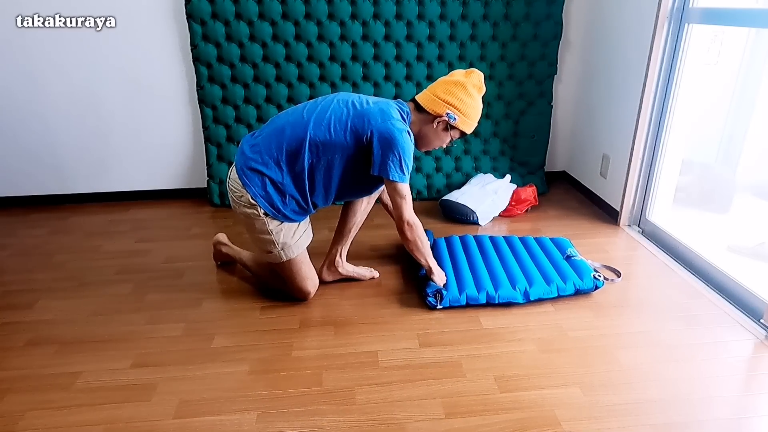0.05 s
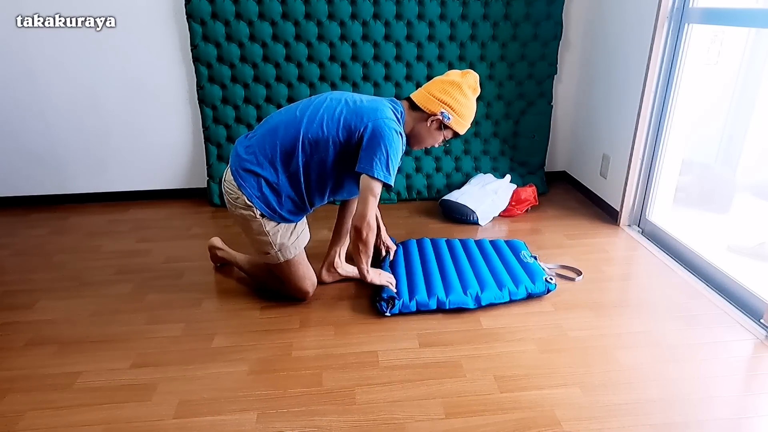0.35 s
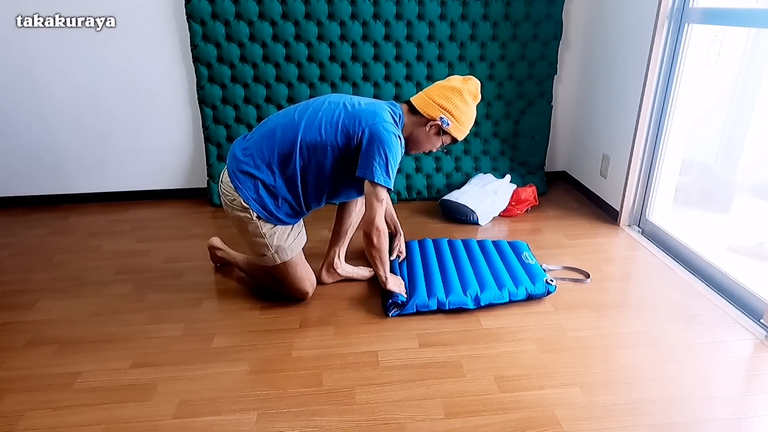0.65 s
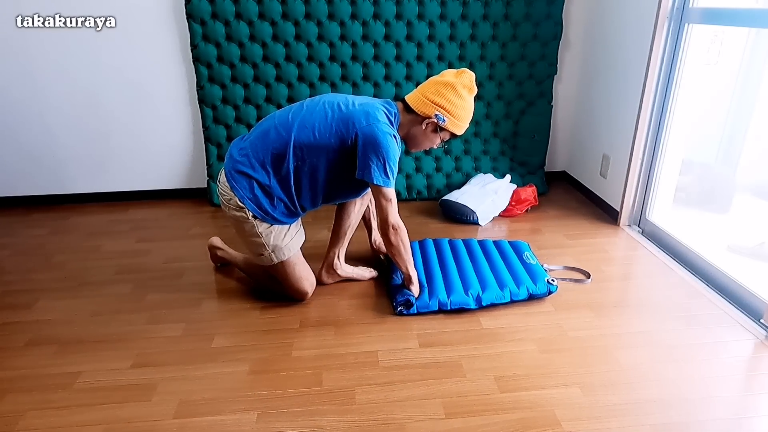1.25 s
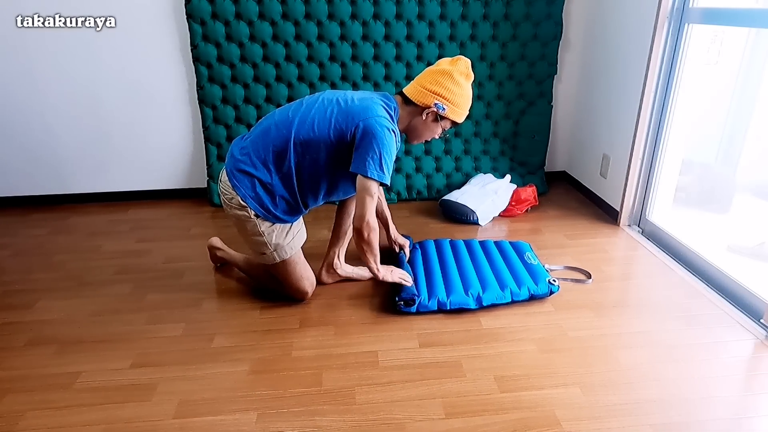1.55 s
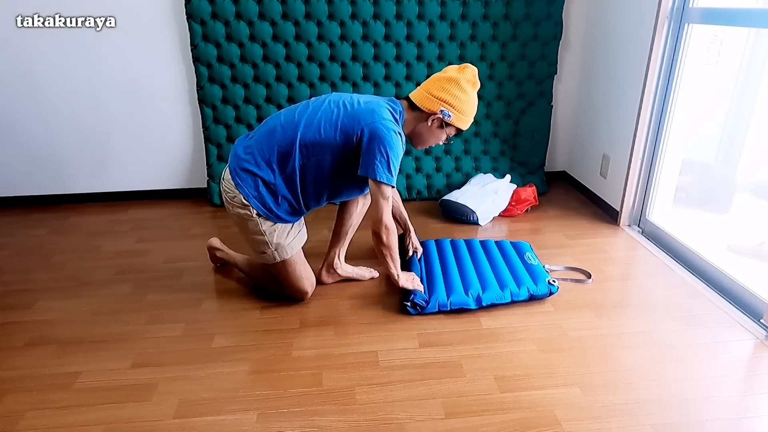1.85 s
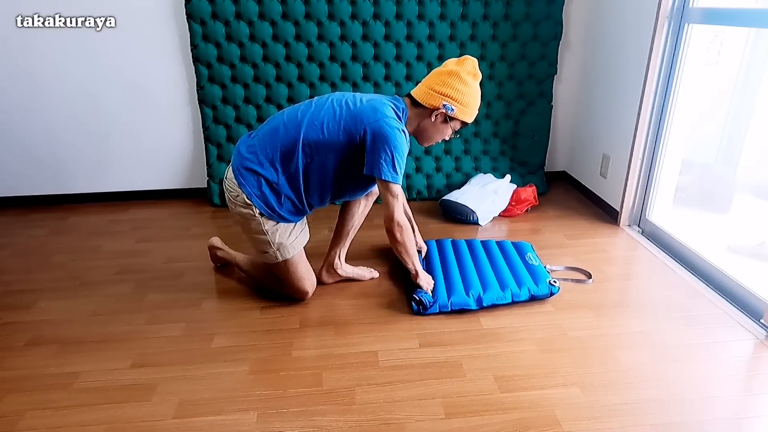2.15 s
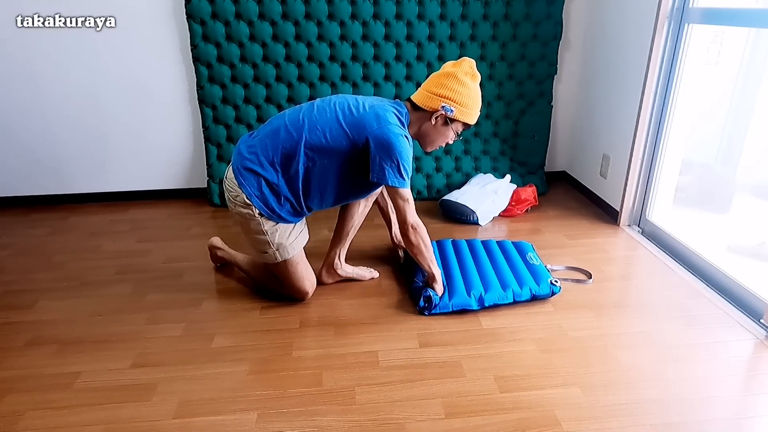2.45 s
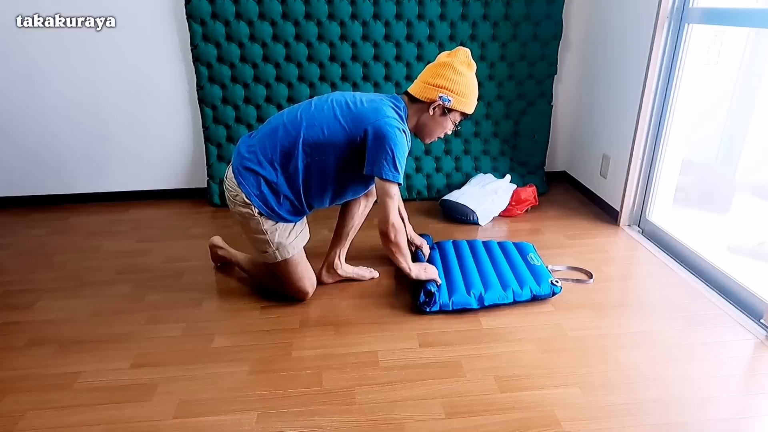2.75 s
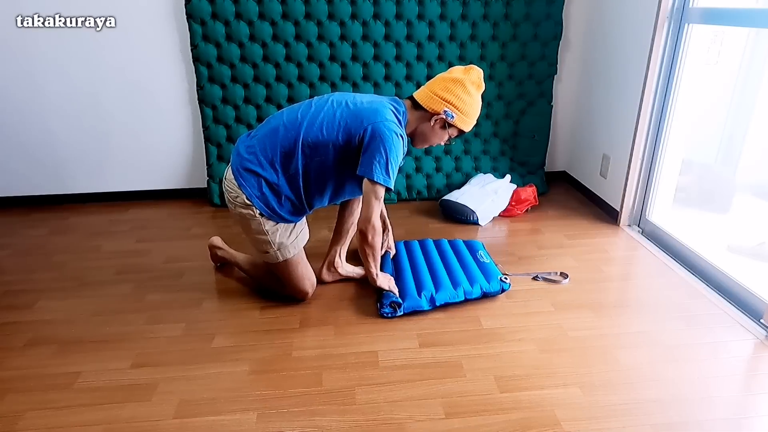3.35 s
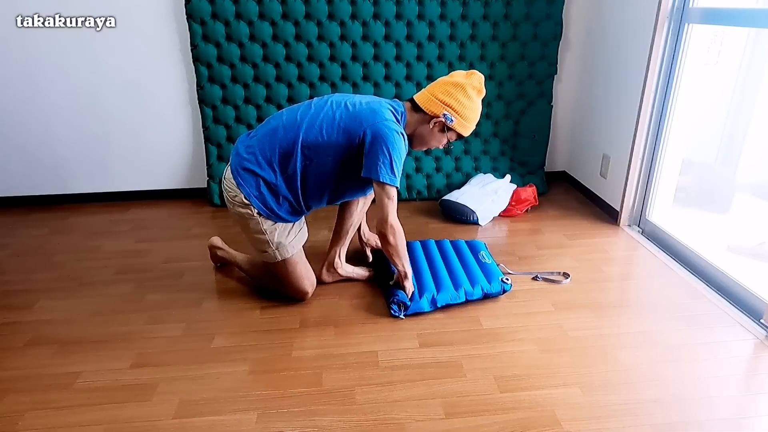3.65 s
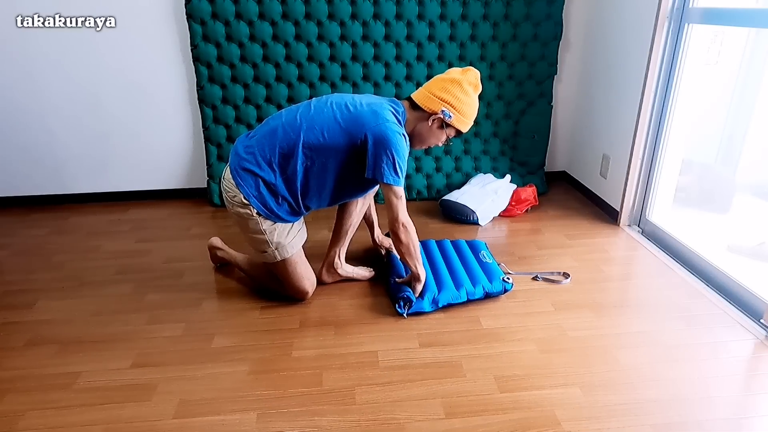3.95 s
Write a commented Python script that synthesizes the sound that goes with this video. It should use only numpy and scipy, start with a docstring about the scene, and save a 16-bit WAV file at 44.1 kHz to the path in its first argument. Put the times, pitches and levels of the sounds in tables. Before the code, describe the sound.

Air hisses in surges from an inflatable mat being rolled up, with rustling and soft bumps.

```python
"""Air hisses out of a valve in surges, with a thin ringing and a few brief whistles.
An inflatable mat is being rolled up on a wooden floor in a small bare room, and each push
drives more air through the valve. Between pushes the nylon rubs and crinkles. Hands and roll
bump dully on the air-filled mat, and the roll rumbles over the boards above a low room noise."""
import sys
import numpy as np
from scipy import signal
from scipy.fft import rfft, irfft
from scipy.io import wavfile

SR = 44100
rng = np.random.default_rng(int(sys.argv[2]) if len(sys.argv) > 2 else 0)


def file_out(sig):
    """Save sig as 16-bit WAV at sys.argv[1]."""
    # one column per channel
    cols = np.atleast_2d(sig).T
    # limit, then scale
    lim = np.clip(cols, -1, 1)
    pcm = np.round(lim * 32767).astype(np.int16)
    wavfile.write(sys.argv[1], SR, pcm)


N = 176400

# How strongly air flows through the valve. Each row: time in seconds, relative level in dB.
AIR_FLOW = [(0,-31),(.07,-29.5),(.14,-30.5),(.24,-30.5),(.33,-39),(.46,-43.5),(.61,-43.5),(.76,-30),(.84,-29.5),(.92,-27),(1.02,-27),(1.07,-32.5),(1.23,-41.5),(1.31,-40),(1.43,-31),(1.56,-30.5),(1.66,-41),(1.84,-44),(1.93,-34.5),(2.02,-29),(2.22,-27.5),(2.35,-27.5),(2.44,-34.5),(2.55,-42),(2.62,-37),(2.74,-31.5),(2.84,-29.5),(2.92,-35),(3.04,-43),(3.13,-39.5),(3.22,-31),(3.31,-29),(3.40,-37),(3.49,-35.5),(3.63,-33),(3.75,-37.5),(3.83,-40),(3.92,-34),(4.0,-31)]
# The air jet's colour (its mix of low and high). Each row: frequency in Hz, relative level in dB.
JET_COLOUR = [(30,-47),(300,-17),(800,-17),(1500,-23),(2300,-7),(3200,-7.5),(3900,-3.5),(4600,-1.5),(5250,-1),(5900,-8.5),(7200,-11),(9000,-26),(14000,-51)]
# The finer, brighter hiss of the jet. Each row: frequency in Hz, relative level in dB.
FINE_HISS_COLOUR = [(2000,-3),(5000,5.5),(6500,-6.5),(8500,-0.5),(10500,-2.5),(12200,-2),(13300,-6),(14500,-52)]
# Where the valve rings. Each row: pitch in Hz, half width in Hz, relative level in dB.
VALVE_RINGS = [(2735,12,-8),(3175,20,-23),(3455,12,-9.5),(3607,21,-4),(3860,17,-9),(4138,49,0),(4345,25,0),(4463,26,0),(4527,29,-2.5),(4698,22,1.5),(4740,30,-19),(4980,14,-2.5),(5187,18,-2),(5040,47,-16),(5600,39,-7),(6115,54,-8)]
# Brief whistles. Each row: peak time in seconds, half length in seconds, pitch in Hz, level in dB.
WHISTLES = [(1.51,.1,2760,-42),(1.53,.07,4780,-40),(.99,.06,4710,-35),(.98,.06,4970,-38),(3.26,.07,2750,-44),(.14,.1,5100,-41)]
# Nylon sliding under the hands. Each row: time in seconds, relative level in dB.
RUB_LEVELS = [(0.0, -35.5), (0.39, -40), (0.41, -36), (0.52, -35.5), (0.56, -39.5), (1.01, -37.5),
              (1.06, -36), (1.32, -41), (1.47, -41), (1.6, -45.5), (1.7, -36), (1.86, -42), (1.9, -39.5),
              (2.57, -38), (2.62, -43), (2.85, -35), (2.91, -40), (2.99, -35.5), (3.11, -40.5), (3.48, -36),
              (3.64, -40), (3.79, -33), (3.84, -39.5), (3.89, -37), (3.92, -45.5), (4.0, -33.5)]
# The colour of that rubbing. Each row: frequency in Hz, relative level in dB.
RUB_COLOUR = [(25,-36),(100,-6),(170,8),(220,-1),(330,-1),(590,3),(740,-3.5),(1050,1.5),(1700,2),(2600,0),(4500,-5),(6500,-10),(8500,-16),(12000,-21.5),(15000,-41)]
# A hand takes a new grip. Each row: peak time in seconds, half length in seconds, level in dB.
SWISHES = [(1.057,0.051,-32),(1.152,0.021,-36),(1.685,0.037,-35),(1.982,.02,-35),(2.493,0.021,-34.5),(2.983,.035,-35.5),(3.45,.04,-51),(3.762,.04,-42)]
# The colour of those swishes. Each row: frequency in Hz, relative level in dB.
SWISH_COLOUR = [(150,-38),(500,1),(1500,4),(3000,6.5),(5000,1),(7200,-1.5),(8500,-10),(12000,-20),(14000,-40)]
# Duller scrapes. Each row: peak time in seconds, half length in seconds, pitch in Hz, level in dB.
SCRAPES = [(.44,0.034,1710,-43),(0.51,.03,1510,-41),(1.484,0.018,980,-38.5),(1.734,0.028,1230,-43),(3.717,0.083,1900,-42)]
# Single creases snapping. Each row: start in seconds, level in dB.
CREASES = [(.442,-37),(0.632,-41),(0.678,-27),(0.91,-30.5),(1.657,-34),(1.889,-29),(1.978,-33),(3.418,-29)]
# The colour of a snap. Each row: frequency in Hz, relative level in dB.
CREASE_COLOUR = [(150,-20),(600,2),(1400,8),(4500,-4.5),(7000,-9),(12000,-27),(14000,-45)]
# The roll is pressed and bumped on the floor. Each row: peak time in seconds, rise in seconds,
# relative level of the hollow sound in dB, relative level of the deep thud in dB.
BUMPS = [(0.01,0.032,-32.5,-34.5),(0.158,0.044,-37,-43),(0.294,0.018,-48,-36),(0.488,0.022,-38.5,-40.5),(0.75,0.09,-41.5,-41),(0.963,0.061,-36.5,-43),(1.07,0.018,-41,-48),(1.18,0.058,-34,-47),(1.483,0.043,-35,-57),(1.583,0.015,-33.5,-53),(1.679,0.029,-40.5,-38),(1.794,0.054,-37.5,-53),(1.97,0.037,-34.5,-44),(2.114,0.042,-45,-36),(2.257,0.059,-36.5,-41),(2.438,0.049,-35,-56),(2.518,0.029,-34.5,-30),(2.583,0.022,-35.5,-51),(2.733,0.036,-38,-40),(2.793,0.02,-29,-38),(2.996,0.051,-36.5,-38),(3.171,0.029,-34.5,-45),(3.268,0.028,-32.5,-41),(3.728,0.033,-33.5,-53),(3.789,0.013,-27.5,-46),(3.841,.02,-39,-40),(3.97,0.049,-38,-39.5)]
# The hollow sound of the air chambers. Each row: frequency in Hz, relative level in dB.
HOLLOW_COLOUR = [(20,-50),(60,-56),(120,-7),(160,2),(190,-1.5),(225,6),(280,-10.5),(340,0),(450,-3.5),(610,-0.5),(720,-22),(1100,-9),(2500,-60),(8000,-60)]
# The deep thud of the floor. Each row: frequency in Hz, relative level in dB.
THUD_COLOUR = [(20,-25),(38,-30),(56,7),(75,-19),(112,6),(145,-19),(250,-9),(1000,-39)]
# Hollow knocks of the roll. Each row: start in seconds, pitch in Hz, relative level in dB.
KNOCKS = [(0.501,224,-22),(1.179,195,-21),(2.493,55.3,-20),(2.759,112,-25),(2.99,180,-23),(3.161,201,-21),(3.785,56.7,-29)]
# The roll moves over the boards. Each row: peak time in seconds, half length in seconds, level in dB.
RUMBLES = [(.93,0.1,-36),(1.16,0.054,-39.5),(1.733,0.078,-40),(2.147,0.11,-45)]
# The colour of that rumble. Each row: frequency in Hz, relative level in dB.
RUMBLE_COLOUR = [(40,-25),(85,-8),(110,0.5),(170,-2),(260,-9),(600,-24),(2000,-53)]
# The steady noise of the room. Each row: frequency in Hz, relative level in dB.
ROOM_TONE_COLOUR = [(20,-20),(55,3),(110,0.5),(220,4.5),(550,1.5),(750,-38),(3000,-28),(14000,-45)]
# How wide the sound is. Each row: frequency in Hz, level of the side against the middle in dB.
STEREO_WIDTH = [(25,-23),(55,-16),(110,-15),(220,-12.5),(550,-17),(750,-5.5),(1000,-6.5),(1600,-9),(2600,-4.5),(3300,-6),(4700,-9),(6500,-7),(8500,-3.5),(9700,-6),(10700,-12),(11200,-17),(12200,-3),(13500,-1.5)]
# Which way the sound leans. Each row: frequency in Hz, level of left over right in dB.
STEREO_LEAN = [(60, -0.13), (110, -0.49), (200, -0.29), (370, 0.68), (690, 2.3), (1260, 0.047), (2320, 1.6),
               (4260, -0.43), (7830, 1.1), (14400, 0.87)]

FULL_FLOW_DB, FLUTTER_DB = -33, 0.63
JET_DB, FINE_HISS_DB, RING_DB = -1, -9, -2.5
RING_GROWTH, FINE_HISS_GROWTH = 0.76, 1.23  # dB gained for each dB of flow
WHISTLE_WAVER_HZ, WHISTLE_FLUTTER_DB = 22, 3
RUB_DB, SLIDE_DB, RUB_ROUGH_DB = 3, -2, 1
CRINKLES_PER_S, CRINKLE_SPREAD_DB, CRINKLE_DB = 350, 3, -8
SCRAPE_HALF_WIDTH_HZ, CREASE_DECAY_S = 430, 0.0061
BUMP_FALL_STRETCH, BUMP_ROUGH_DB = 1.23, 1.3
KNOCK_ATTACK_S, KNOCK_DECAY_S = .01, .018
ECHO_S, ECHO_DB, ROOM_TONE_DB = 0.32, -2.5, -45.5
TOP_HZ = 14900


def valve():
    """Escaping air hisses and rings the valve; the stronger the flow, the more bright hiss wins."""
    push_db = curve(AIR_FLOW) + FLUTTER_DB * wander(15) - FULL_FLOW_DB
    ring_power = sum((undb(db) * resonance(hz, width)) ** 2 / width for hz, width, db in VALVE_RINGS)
    hiss = undb(JET_DB + push_db) * echoed_noise(colour(JET_COLOUR))
    ring = undb(RING_DB + RING_GROWTH * push_db) * noise(np.sqrt(ring_power))
    fine_hiss = undb(FINE_HISS_DB + FINE_HISS_GROWTH * push_db) * echoed_noise(colour(FINE_HISS_COLOUR))
    whistles = sum(undb(db) * swell(at, length) * whistle(hz) for at, length, hz, db in WHISTLES)
    return undb(FULL_FLOW_DB) * (hiss + ring + fine_hiss) + whistles


def whistle(hz):
    """Air in the valve makes a tone that wavers in pitch and strength."""
    phase = 2 * np.pi * np.cumsum(hz + WHISTLE_WAVER_HZ * wander(70.6)) / SR
    return unit(np.sin(phase) * undb(WHISTLE_FLUTTER_DB * wander(35)))


def nylon():
    """The fabric slides and crinkles under the hands, swishes at each new grip and sometimes scrapes."""
    ticks = (rng.random(N) < CRINKLES_PER_S / SR) * rng.choice([-1, 1], N)
    tick_sizes = undb(CRINKLE_SPREAD_DB * np.minimum(rng.exponential(size=N), 4.5))
    slide = echoed_noise(colour(RUB_COLOUR)) * undb(SLIDE_DB + RUB_ROUGH_DB * wander(27))
    crinkle = undb(CRINKLE_DB) * to_stereo(room_echo(ticks * tick_sizes), colour(RUB_COLOUR))
    grips = swells(SWISHES) * echoed_noise(colour(SWISH_COLOUR))
    scrapes = sum(undb(db) * swell(at, length) * echoed_noise(resonance(hz, SCRAPE_HALF_WIDTH_HZ))
                  for at, length, hz, db in SCRAPES)
    return undb(curve(RUB_LEVELS) + RUB_DB) * (slide + crinkle) + grips + scrapes


def creases():
    """Folds snap over with a short crack."""
    t = np.arange(N) / SR
    cracks = sum(undb(db) * (t >= at) * np.exp(-abs(t - at) / CREASE_DECAY_S) for at, db in CREASES)
    return cracks * noise(colour(CREASE_COLOUR))


def bumps():
    """The air chambers sound hollow when handled, and the floor thuds under them."""
    hollow = sum(undb(db) * swell(at, rise, BUMP_FALL_STRETCH) for at, rise, db, _ in BUMPS)
    thud = sum(undb(db) * swell(at, rise, BUMP_FALL_STRETCH) for at, rise, _, db in BUMPS)
    roughness = undb(BUMP_ROUGH_DB * wander(90) - 1)
    return roughness * (hollow * noise(colour(HOLLOW_COLOUR)) + thud * noise(colour(THUD_COLOUR)))


def knocks():
    """The roll lands on the floor and the air chamber booms briefly."""
    t = np.arange(N) / SR
    booms = np.zeros(N)
    for at, hz, db in KNOCKS:
        age = np.maximum(t - at, 0)
        loudness = (1 - np.exp(-age / KNOCK_ATTACK_S)) * np.exp(-age / KNOCK_DECAY_S)
        booms += undb(db) * loudness * np.sin(2 * np.pi * hz * age)
    return booms


def rolling():
    """The tight roll rumbles as it is pushed over the boards."""
    return swells(RUMBLES) * noise(colour(RUMBLE_COLOUR))


def room_tone():
    """A low, steady noise fills the room."""
    return undb(ROOM_TONE_DB) * noise(colour(ROOM_TONE_COLOUR))


def room_echo(sound):
    """Bare walls add a short echo from all around; gives a middle and a side signal."""
    t = np.arange(SR // 2) / SR
    echo = rng.standard_normal((2, len(t))) * np.exp(-np.log(1000) * t / ECHO_S)  # 60 dB down at ECHO_S
    echo *= undb(ECHO_DB) / np.sqrt(np.sum(echo[0] ** 2))
    echo[0, 0] += 1  # the direct sound, in the middle
    echo /= np.linalg.norm(echo, axis=1, keepdims=True)
    return signal.fftconvolve(sound[None], echo, axes=1)[:, :N]


def noise(gains):
    """Stereo noise of a given colour."""
    return to_stereo(rng.standard_normal((2, N)), gains)


def echoed_noise(gains):
    """Stereo noise of a given colour that has bounced around the room."""
    return to_stereo(room_echo(rng.standard_normal(N)), gains)


def to_stereo(pair, gains):
    """Colour a middle and a side signal and turn them into left and right at a standard level."""
    mid, side = rfft(pair) * gains
    side = side * colour(STEREO_WIDTH)
    lean = np.sqrt(colour(STEREO_LEAN))
    left, right = (mid + side) * lean, (mid - side) / lean
    return irfft(np.array([left, right]), N) / np.std(irfft(mid, N))


def colour(rows):
    """Turn rows of Hz and dB into a gain for every frequency."""
    hz, db = np.array(rows).T
    return undb(np.interp(np.log(np.fft.rfftfreq(N, 1 / SR) + 1), np.log(hz), db))


def resonance(hz, half_width):
    """Gains that favour the frequencies near one pitch."""
    return (1 + ((np.fft.rfftfreq(N, 1 / SR) - hz) / half_width) ** 2) ** -1


def wander(rate_hz):
    """A smooth random wobble with a typical size of 1."""
    return unit(irfft(rfft(rng.standard_normal(N)) * resonance(0, rate_hz), N))


def swell(at, half_length, fall_stretch=1):
    """A rounded rise and fall around one moment."""
    offset = (np.arange(N) / SR - at) / half_length
    return np.exp(-.5 * np.where(offset < 0, offset, offset / fall_stretch) ** 2)


def swells(rows):
    """Add up several swells, each at its own level."""
    return sum(undb(db) * swell(at, half_length) for at, half_length, db in rows)


def curve(rows):
    """Join rows of time and value with straight lines."""
    return np.interp(np.arange(N) / SR, *np.array(rows).T)


def undb(db):
    """Turn decibels into a gain, a number to multiply by."""
    return 10 ** (np.asarray(db) / 20)


def unit(x):
    """Scale a signal to an average power of 1."""
    return x / np.sqrt(np.mean(x ** 2))


def scene():
    """Valve, fabric and the roll on the floor, over the noise of the room."""
    return valve() + nylon() + creases() + bumps() + knocks() + rolling() + room_tone()


def record(dry):
    """Cut away the very highest treble."""
    return signal.sosfilt(signal.ellip(10, .2, 80, TOP_HZ, fs=SR, output="sos"), dry)


dry = scene()
out = record(dry)
file_out(out)
```